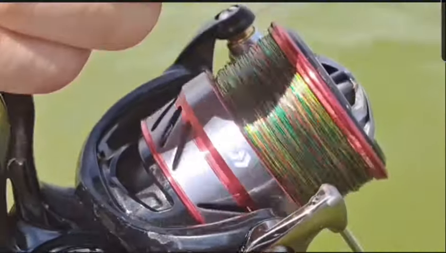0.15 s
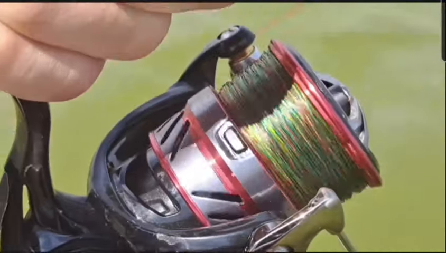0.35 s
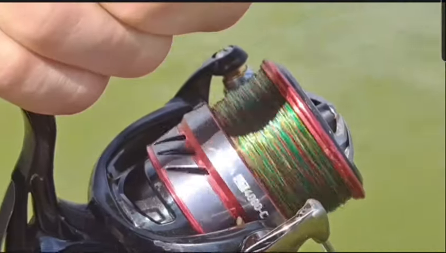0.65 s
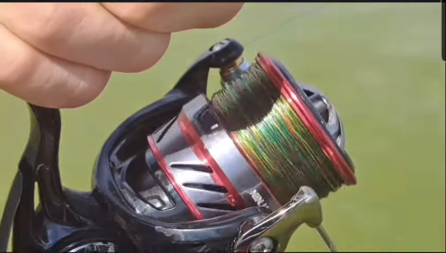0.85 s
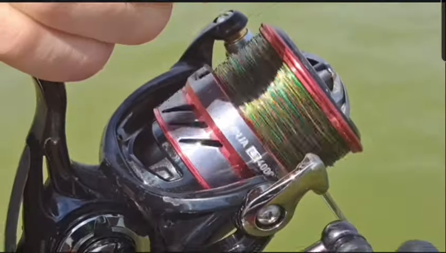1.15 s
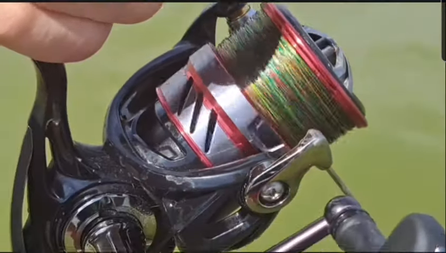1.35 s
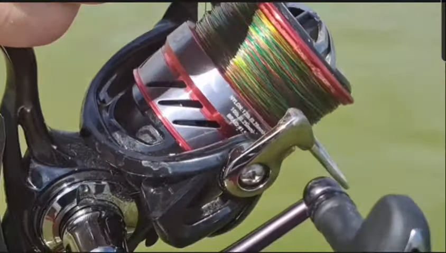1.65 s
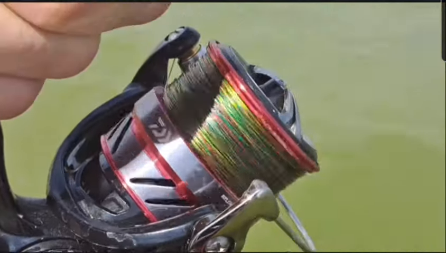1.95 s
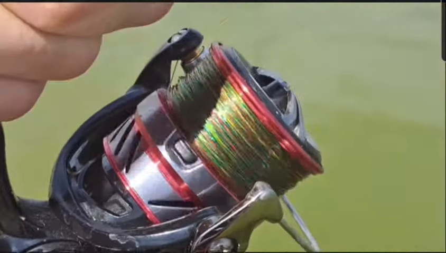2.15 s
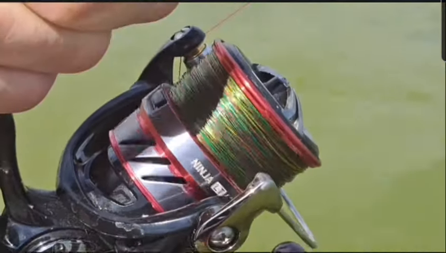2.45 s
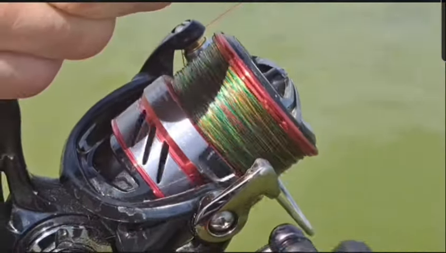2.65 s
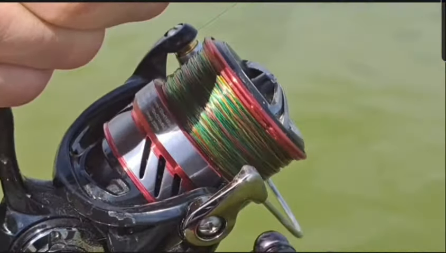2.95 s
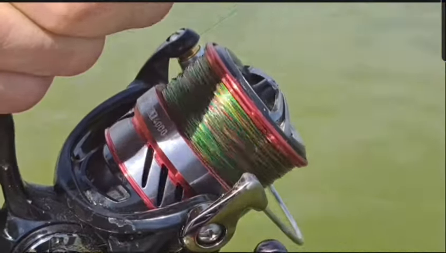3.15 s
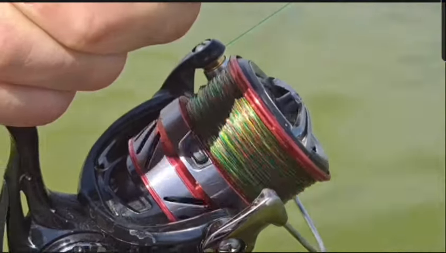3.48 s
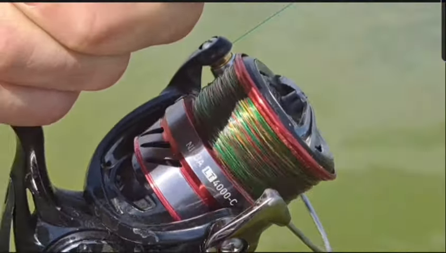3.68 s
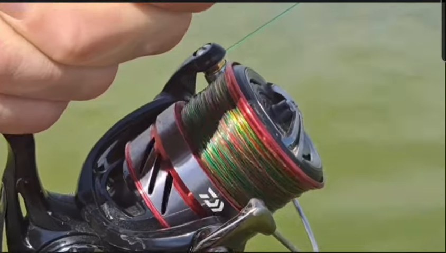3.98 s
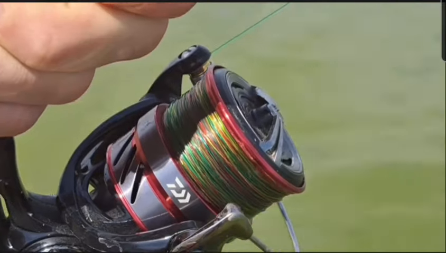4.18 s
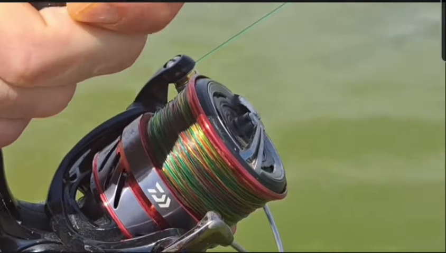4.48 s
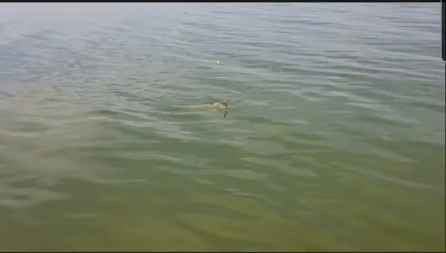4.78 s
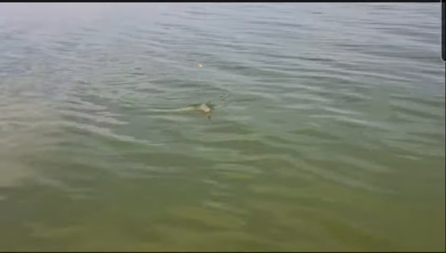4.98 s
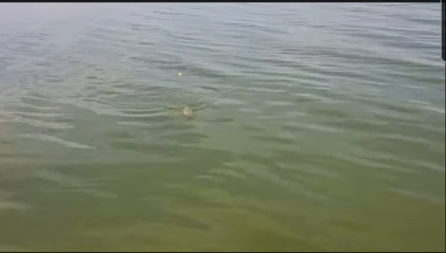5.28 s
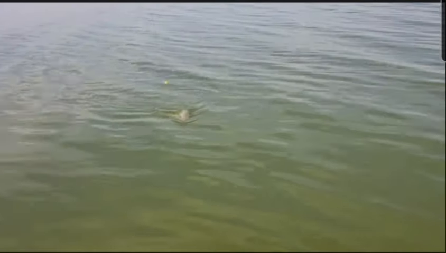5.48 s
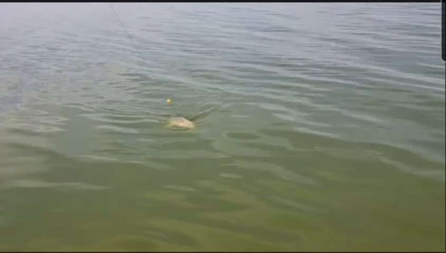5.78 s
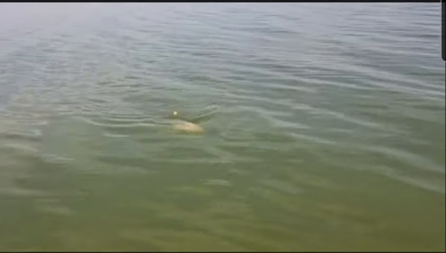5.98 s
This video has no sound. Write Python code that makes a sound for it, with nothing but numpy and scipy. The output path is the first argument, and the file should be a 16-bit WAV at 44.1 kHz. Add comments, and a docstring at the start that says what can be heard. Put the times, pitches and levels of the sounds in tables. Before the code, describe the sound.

A thin, crisp ratchet purr from a reel right at the stereo microphone, with pinging spring and hissy treble, rises and falls unevenly, then winds down tick by tick to rest. Far off a low motor hums in soft wind; its bass drops suddenly early on. A hard cut brings a pond, where a fish stirs the surface in wet slaps, gurgling bubbles and fine spray, calms, then splashes again.

```python
"""A spinning reel close to the microphones gives line to a hooked fish: the drag's pawl buzzes over its ratchet,
slows to single ticks and stops. Each tooth is a burst of noise that strikes resonances and a pinging spring.
Behind it an engine drones far off (sine multiples) under a breeze of coloured noise. Then the scene switches abruptly
to the open pond: wind, the engine at a lower speed, and water sloshing round the fish as noise and ringing bubbles."""
import sys
import numpy as np
from scipy import signal
from scipy.fft import rfft, irfft
from scipy.io import wavfile

SR = 44100
rng = np.random.default_rng(int(sys.argv[2]) if len(sys.argv) > 2 else 0)


def store_pcm(level_fs):
    """Save levels as 16-bit WAV."""
    pcm = np.round(np.clip(level_fs, -1, 1) * 32767).astype(np.int16)
    wavfile.write(sys.argv[1], SR, np.atleast_2d(pcm).T)


N = 270010
T = np.arange(N) / SR   # time of every sample [s]
# end of the even buzz, standstill of the spool, cut to the pond
BUZZ_END_S, STOP_S, SWITCH_S = 3.575, 4.3, 4.866

# Pans are left over right, positive to the left. Noise colours are relative: their layers set the level.

# microphone pair in the open, likeness of its channels: (frequency [Hz], correlation [-1 to 1])
LIKENESS = [(30, 0.3), (120, 0.75), (300, 0.83), (640, 0.24), (1400, -0.18), (3000, -0.22), (15000, 0)]
# place of the open surroundings: (frequency [Hz], pan [dB])
OPEN_PAN = [(60, 3), (200, -3.5), (700, -3), (1300, -5), (2400, -11.5), (4400, -20.5), (8000, -8.5),
            (14000, 2)]
# place of the sounds near the reel: (frequency [Hz], pan [dB])
NEAR_PAN = [(200, -2.5), (500, 0.5), (1300, -2), (3000, -6.5)]

# far engine heard by the reel: (time [s], speed [turns per s])
ENGINE_SPEED = [(0, 36), (2.2, 36), (3.0, 34.5), (3.7, 36.1)]
# its lines by the reel, over the throb: (multiple of the turning rate, relative level [dB])
DRONE = [(1, -7.5), (2, -0.5), (4, -14), (6, -7.5), (7, -9.5), (8, -22.5), (10, -26)]
# its firing tone on the third multiple: (time [s], level [dB])
FIRING_LEVEL = [(0, -44.5), (0.9, -45.5), (1.12, -39.5), (1.24, -54), (2.0, -51.5), (2.85, -47.5),
                (3.45, -45.5), (3.85, -51), (4.8, -46.5)]
# its lines by the pond: (multiple of the turning rate, level [dB])
POND_DRONE = [(3, -57.5), (5, -47), (7, -58), (8, -47.5), (10, -55.5), (11, -64)]
# a second low hum over the pond: (multiple of its pitch, level [dB])
POND_HUM = [(1, -57), (2, -51)]
POND_ENGINE_HZ, POND_HUM_HZ = 30.83, 62.2
# the bass sits on the left at first, then in the middle: (time [s], pan [dB])
BASS_PAN = [(0, 19.5), (1.19, 20), (1.24, 1), (4.87, 1)]
# the bass drops abruptly once and creeps back
BASS_DROP_S, BASS_RETURN_S = 1.17, 0.49
THROB_DB = (-45.5, -59.5, -53.5)   # before the drop, just after it, in the end
RUMBLE_DB, RUMBLE_EXTRA_DB = -53.5, 4   # low rumble of the air; the extra before the drop
GUST_DB = 1.17   # swing of the gusts

# colour of the air's rumble: (frequency [Hz], density [dB per Hz])
RUMBLE = [(20, 0), (90, 0.5), (160, -1), (220, 2.5), (300, -4.5), (400, -27.5)]
# colour of the breeze: (frequency [Hz], density [dB per Hz])
BREEZE = [(350, 9.5), (500, -4.5), (650, -9), (900, -16.5)]
# level of the breeze, which drops as the spool stops: (time [s], level [dB])
BREEZE_LEVEL = [(0, -59), (1.3, -58.5), (1.7, -54), (2.1, -57.5), (3.9, -58.5), (4.4, -66)]
# colour of the steady hiss: (frequency [Hz], density [dB per Hz])
HISS = [(3300, 13.5), (4200, 12), (7000, 11.5), (9000, -6), (12000, -3), (15500, -2)]
# colour of a faint, wide rush of the surroundings: (frequency [Hz], density [dB per Hz])
FAR_RUSH = [(650, -6), (880, -11), (1150, -1), (1400, 3.5), (1700, -3.5), (2100, -7)]
# likeness of its two channels: (frequency [Hz], correlation [-1 to 1])
FAR_RUSH_LIKENESS = [(650, 0.2), (1200, -0.67)]
FAR_RUSH_DB = -64
# a faint hiss that wavers in the background: (time [s], centre [Hz], level [dB])
WAVER = [(3.9, 2284, -74), (4.08, 2320, -70), (4.3, 2116, -73), (4.5, 1740, -80), (4.65, 1900, -69.5),
         (4.85, 2170, -68)]
WAVER_WIDTH_HZ = 360
# soft knocks of the hand on the rod: (time [s], level [dB])
KNOCKS = [(3.387, -41), (4.421, -45.5)]
# colour of the knocks: (frequency [Hz], density [dB per Hz])
KNOCK = [(250, 11), (600, -11), (1300, -7), (2200, -12)]

# colour of the wind over the pond: (frequency [Hz], density [dB per Hz])
WIND = [(12, -37), (20, -0.5), (80, -16), (145, -2), (201, -6.5), (247, -7), (380, -16), (435, -16),
        (700, -53), (910, -47), (1540, -120)]
# its level: (time [s], level [dB])
WIND_LEVEL = [(4.87, -44), (4.92, -48.5), (5.93, -45.5), (5.99, -49)]
# colour of sloshing water: (frequency [Hz], density [dB per Hz])
SLOSH = [(350, 1), (550, -3), (750, -11.5), (1100, -4), (1900, -4.5), (2600, -12.5), (3200, -60)]
# colour of the spray: (frequency [Hz], density [dB per Hz])
SPRAY = [(1410, 2.5), (2400, 9.5), (3550, 2), (5080, 7), (6270, 0.5), (6780, -2), (9410, -18.5),
         (12800, -12), (15500, -21)]
# the fish stirs the water:
# (time of peak [s], relative slosh [dB], relative spray [dB], swell [s], fall [s])
SLOSHES = [(4.88, -38.5, -43.5, 0.023, 0.045), (5.0, -49, -49.5, 0.089, 0.81),
           (5.185, -37.5, -47, 0.058, 0.12), (5.29, -42, -48.5, 0.038, 0.22),
           (5.42, -42.5, -52, 0.062, 0.025), (5.53, -45, -85, 0.021, 0.022),
           (6.033, -44.5, -44, 0.044, 0.065), (6.095, -40.5, -43.5, 0.041, 0.069)]
LAP_DB, FIZZ_DB = -49.5, -51.5   # lapping and spray between sloshes, on the scale of SLOSHES
SLOSH_LUMPS_DB = 2   # the slosh comes in lumps
# slaps of water: (time [s], relative level [dB], decay constant [s])
SLAPS = [(4.869, -60, 0.0076), (4.881, -42, 0.0008), (5.121, -40, 0.0066), (5.182, -59, 0.011),
         (5.28, -43, 0.007), (6.022, -57, 0.0036), (6.042, -44, 0.0021), (6.09, -57, 0.004)]
# big bubbles: (time [s], starting pitch [Hz], relative level [dB], decay by 60 dB [s])
PLOPS = [(4.881, 810, -11, 0.006), (4.884, 623, -44, 0.055), (5.09, 488, -43, 0.074),
         (5.121, 624, -35, 0.07), (5.148, 683, -38.5, 0.21), (5.181, 725, -23, 0.056),
         (5.205, 883, -32, 0.05), (5.28, 626, -48, 0.08), (5.484, 480, -32, 0.037),
         (5.505, 680, -30.5, 0.03), (5.522, 727, -38, 0.03), (5.819, 510, -37.5, 0.043),
         (5.978, 846, -30, 0.034), (5.998, 670, -38, 0.049), (6.023, 920, -26.5, 0.024),
         (6.034, 630, -29.5, 0.041), (6.048, 694, -33.5, 0.078), (6.052, 910, -35, 0.043),
         (6.086, 496, -32.5, 0.12), (6.094, 777, -31, 0.045)]
# single drops of spray tick on the water: (time [s], level [dB])
SPLATS = [(4.882, -31), (4.928, -40), (5.138, -36.5), (5.237, -40), (5.248, -32), (5.34, -36.5),
          (6.038, -28.5), (6.058, -37), (6.089, -37)]
# colour of those ticks: (frequency [Hz], density [dB per Hz])
SPLAT = [(2500, 13), (6000, 14), (9000, -5), (15000, -4)]

# how fast the fish turns the spool, in surges: (time [s], speed [ratchet teeth per s])
SPOOL = [(0.0, 96.1), (0.1, 82.6), (0.22, 65.7), (0.29, 53.1), (0.4, 52.7), (0.47, 75.8), (0.62, 81.6),
         (0.67, 92.2), (0.75, 96.6), (0.8, 102.7), (0.88, 93.5), (1.03, 111.9), (1.12, 102.6), (1.27, 99.9),
         (1.4, 83.3), (1.48, 71.7), (1.57, 74.9), (1.71, 63.2), (1.79, 46.4), (1.87, 51.0), (1.97, 56.7),
         (2.05, 77.1), (2.18, 66.7), (2.3, 60.0), (2.38, 67.8), (2.45, 93.4), (2.53, 99.6), (2.65, 86.6),
         (2.75, 79.2), (2.83, 100.7), (2.96, 102.7), (3.03, 79.9), (3.2, 63.8), (3.4, 52.3), (3.59, 44.0)]
CRUISE_TEETH_PER_S = 75
# the reel sways towards the middle, between the microphone ports: (time [s], pan [dB])
REEL_PAN = [(0, -3.5), (1.1, -2), (2.0, 1), (3.6, -1.5), (4.3, -3.5)]
# colour of the rustling line: (frequency [Hz], density [dB per Hz])
RUSTLE = [(650, -4.5), (950, -10), (1450, -1.5), (1850, -2), (2300, -1.5), (2650, -0.5)]
# rustle against SNAP_LEVEL at cruising speed, its rise per doubling of speed, its flicker
RUSTLE_DB, RUSTLE_DB_PER_OCTAVE, RUSTLE_FLICKER_DB = -21.5, 6, 2.0
# one soft swish as the spool runs down: middle, half length, pitch, width, level
SWISH_S, SWISH_HALF_S, SWISH_HZ, SWISH_WIDTH_HZ, SWISH_DB = 3.83, 0.23, 1431, 160, -60.5

# Levels of the drag are relative: drag() adds the gains given in scene().
# how loudly the pawl's snap reaches the microphone: (time [s], relative level [dB])
SNAP_LEVEL = [(0, -29.5), (0.5, -31.5), (1.15, -32.5), (1.27, -35.5), (1.9, -34.5), (2.8, -36.5),
              (3.6, -36)]
# colour of the dry snap of a tooth: (frequency [Hz], density [dB per Hz])
SNAP = [(1000, -13), (2250, -6.5), (3000, -19), (4200, -5), (5600, 2), (6300, 6.5), (8000, 8), (9000, -5.5),
        (10500, 7), (13000, 5), (15700, 5)]
# its place, on top of the reel's: (frequency [Hz], pan [dB])
SNAP_PAN = [(2000, 4), (5800, -0.5), (7500, 11), (8800, 11), (10500, 1.5), (15000, 3.5)]
# colour of the crack of the landing: (frequency [Hz], density [dB per Hz])
CRACK = [(10500, -8), (13000, 1), (15500, -4)]
# teeth on which the pawl catches hard and its spring rings out: (time [s], relative ring [dB])
CATCHES = [(0.046, -27.5), (0.101, -24.5), (0.114, -28), (0.126, -26), (0.139, -28), (0.223, -30),
           (0.273, -23), (0.291, -23), (0.311, -21), (0.568, -30.5), (0.618, -27), (0.654, -26.5),
           (0.697, -25), (0.782, -28), (1.036, -30), (1.249, -35), (1.322, -29), (1.464, -29.5),
           (1.719, -31), (1.735, -28), (1.814, -35), (1.95, -27.5), (2.425, -27.5), (2.541, -28.5),
           (2.814, -32), (3.241, -33), (3.274, -32)]
# single ticks as the spool runs down, one faint bounce, and two late ticks after it stops:
# (time [s], relative snap [dB], spring ring [dB],
# low spool ring [dB], middle spool ring [dB], high spool ring [dB])
TICKS = [(3.585, -36, -40, -60, -39, -51), (3.611, -37, -40, -52, -37, -54),
         (3.638, -38, -38, -57, -39, -43), (3.668, -37.5, -42, -46, -38.5, -47),
         (3.701, -37, -53, -44, -38, -45), (3.738, -34.5, -42, -59, -38, -62),
         (3.775, -38, -46, -58, -40, -47), (3.815, -38.5, -59, -52, -44, -52),
         (3.86, -39.5, -48, -46, -38, -52), (3.903, -37, -44, -50, -58, -50),
         (3.945, -37.5, -46, -59, -52, -47), (3.986, -37.5, -39, -50, -49, -48),
         (4.032, -39.5, -45, -48, -46, -55), (4.081, -39.5, -37.5, -50, -42, -45),
         (4.136, -36, -39.5, -56, -45, -51), (4.152, -53, -65, -66, -68, -59),
         (4.2, -38.5, -51, -48, -62, -48), (4.286, -39, -31.5, -60, -44.5, -62),
         (4.803, -38.5, -51, -56, -57, -54), (4.853, -34, -44, -45, -40, -50)]
# damped modes of the body:
# (frequency [Hz], width [Hz], relative level [dB], pan [dB], left lead [samples])
BODY_MODES = [(2330, 300, -21, -2, 19), (4730, 150, -8.5, -2, 19), (5160, 260, -5.5, -2, 18),
              (7150, 300, -4, -5, 23), (7400, 300, -1.5, -6, 23), (9790, 240, -5.5, 3, 23),
              (11400, 300, -11, -1, 22), (12480, 240, -9, 1, 22), (13060, 360, -1, 3, 22),
              (13550, 300, -10, 3, 22), (14750, 420, -6, 3, 19)]
# long-ringing modes of the spool:
# (frequency [Hz], decay by 60 dB [s], relative level [dB], pan [dB], left lead [samples])
SPOOL_RINGS = [(4881, .085, 0, -2, 19), (6770, .12, 1.5, -6, 23), (6964, .1, -6, -6, 23),
               (9364, .085, -1, 4, 22), (11688, .035, 3, 0, 22), (12090, .075, 0, 1, 22),
               (15050, .04, 0, 3, 22)]
LEFT_LEAD = 22   # samples by which snap, crack and spring reach the left port first
RING_SPLIT_HZ = (6000, 9000)   # borders between the spool's low, middle and high rings
SPOOL_RING_DB = (-15.5, -7, -16.5)   # those three during the buzz, against the snap
RING_UNEVEN_DB = 5.5   # they flare up on some teeth and hardly sound on others
OFFSET_S = 0.0014   # a soft noise starts this early before each click; crack and spool ring follow as late
# the snap grows a little louder with speed, while the crack is stronger on a slow spool
SNAP_DB_PER_OCTAVE, CRACK_DB_PER_HALVING = 1.3, 2.5
# the spring rings harder the faster the spool turns: against the snap at cruising speed, per doubling
SPRING_HZ, RING_DB, RING_DB_PER_OCTAVE = 7370, -2.5, 4.5
CATCH_SOFTER_DB = 0.5   # a tooth that sets the spring ringing snaps less
# the pawl scrapes between drops: against SNAP_LEVEL at cruising speed, per doubling, graininess
SCRAPE_DB, SCRAPE_DB_PER_OCTAVE, SCRAPE_GRAIN_DB = -23.5, 6.5, 0
# spread from tooth to tooth
TOOTH_UNEVEN_DB, MODE_UNEVEN_DB, SPRING_UNEVEN_DB, BRIGHT_UNEVEN_DB = 1.1, 3.3, 2.6, 2

CUTOFF_HZ = 15950   # upper limit of the treble


def from_db(db):
    """Decibels to gain."""
    return 10 ** (np.asarray(db) / 20)


def rms_one(x):
    """Scale to rms 1."""
    return x / np.sqrt(np.mean(x ** 2) + 1e-20)


def in_time(rows):
    """Each column of a curve at every sample."""
    s, *columns = np.transpose(rows)
    return [np.interp(T, s, c) for c in columns]


def at_hz(points, hz):
    """Read a table on a log-frequency axis."""
    table_hz, values = np.array(points).T
    return np.interp(np.log(hz + 0.0011), np.log(table_hz), values)


def panned(pan_db):
    """Left and right gains of constant power."""
    gains = from_db(np.array([[.5], [-.5]]) * pan_db)
    return gains / np.sqrt(np.mean(gains ** 2, axis=0))


def left_first(pair, count):
    """The reel is nearer to the left port: the right one hears it some samples later."""
    left, right = pair
    return np.array([left, np.r_[np.zeros(count), right[:-count]]])


def drift(rate):
    """Slow chance of spread 1: noise through a two-pole low-pass, computed every 40 samples."""
    r = np.exp(-80 * np.pi * rate / SR)
    white = rng.standard_normal(N // 40 + 2002)
    slow = signal.lfilter([1], [1, -2 * r, r * r], white)[2000:]   # settled part
    return np.interp(np.arange(N) / 40, np.arange(len(slow)), rms_one(slow))


def resonate(x, hz, width_hz):
    """One resonance; white noise keeps its power."""
    r = np.exp(-np.pi * width_hz / SR)
    poles = [1, -2 * r * np.cos(2 * np.pi * hz / SR), r * r]
    return np.sqrt((1 - r * r) / 2) * signal.lfilter([1, 0, -1], poles, x + 1e-18)


def noise(spectrum, pan, likeness=LIKENESS):
    """Stereo noise of a given colour, place and likeness, falling steeply past its ends; rms 1."""
    hz = np.arange(N // 2 + 1) * SR / N
    mid, side = rfft(rng.standard_normal((2, N)))
    alike = np.clip(at_hz(likeness, hz), -1, 1)
    pair = np.sqrt(1 + alike) * mid + np.sqrt(1 - alike) * side * [[1], [-1]]
    low_hz, high_hz = spectrum[0][0], spectrum[-1][0]
    ends = (1 + (low_hz / (hz + 1)) ** 8) * (1 + (hz / high_hz / 1.2) ** 8)
    colour = from_db(at_hz(spectrum, hz)) / np.sqrt(ends)
    return rms_one(irfft(pair * colour * panned(at_hz(pan, hz)), N))


def bursts(times, levels_db, rise_s, decay_s):
    """An envelope that swells and dies at each time, peaking at its level; overlaps add up."""
    hits, age = np.zeros(N), T[:SR // 8]
    at = np.clip(np.round(np.asarray(times) * SR).astype(int), 0, N - 1)
    np.add.at(hits, at, from_db(levels_db))
    shape = (1 - np.exp(-(age / rise_s) ** 2)) * np.exp(-age / decay_s)
    return signal.oaconvolve(hits, shape / shape.max())[:N]


def add(out, s, sound):
    """Mix a short sound in at its time."""
    at = min(int(s * SR), N - 1)
    out[at:at + len(sound)] += sound[:N - at]


def octaves_over_cruise():
    """Speed of the spool in doublings over its cruising speed; after the buzz it runs down to rest."""
    run_down = np.clip((STOP_S - T) / (STOP_S - BUZZ_END_S), 1e-4, 1)
    return np.log2(in_time(SPOOL)[0] * run_down / CRUISE_TEETH_PER_S)


def round_the_drop(before_db, after_db, end_db):
    """Level of a bass layer: steady, then a sudden drop from which it creeps to its end level."""
    since = np.maximum(T - BASS_DROP_S, 0)
    later_db = end_db + (after_db - end_db) * np.exp(-since / BASS_RETURN_S)
    return before_db + (later_db - before_db) * np.clip(since / 0.021, 0, 1)


def wavering_hiss():
    """As the spool quietens, a faint band of hiss comes up: low noise on a carrier that wanders."""
    centre_hz, level_db = in_time(WAVER)
    low_pass = signal.butter(2, WAVER_WIDTH_HZ / 2, fs=SR, output="sos")
    band = rms_one(signal.sosfilt(low_pass, rng.standard_normal((2, N))))
    carrier = np.sqrt(2) * np.sin(2 * np.pi * np.cumsum(centre_hz) / SR)
    fade_in = np.clip((T - BUZZ_END_S) / 0.5, 0, 1)
    return fade_in * panned(-11) * from_db(level_db + 1.65 * drift(19)) * band * carrier


def engine(turns_hz, lines, waver, flutter_db):
    """Far away only low multiples of the turning rate are left, each fluttering in the wind."""
    phase = 2 * np.pi * np.cumsum(turns_hz * (1 + waver * drift(4.1))) / SR
    out = 0
    for multiple, db in lines:
        level = from_db(db + flutter_db * drift(1.0))
        out = out + level * np.sin(round(multiple) * phase + 2 * np.pi * rng.random())
    return out


def bank():
    """Round the reel: the engine's sines, and noise for rumble, breeze, rush, knocks and hiss."""
    throb_db = round_the_drop(*THROB_DB)
    lines = [(multiple, db + throb_db) for multiple, db in DRONE] + [(3, in_time(FIRING_LEVEL)[0])]
    drone = engine(in_time(ENGINE_SPEED)[0], lines, waver=0.0034, flutter_db=1.7)
    gust_db = GUST_DB * drift(3.5)
    rumble_db = RUMBLE_DB + round_the_drop(RUMBLE_EXTRA_DB, 0, 0) + .5 * gust_db
    rumble = from_db(rumble_db) * noise(RUMBLE, NEAR_PAN)
    breeze = from_db(in_time(BREEZE_LEVEL)[0] + gust_db) * noise(BREEZE, NEAR_PAN)
    knocks = bursts(*np.transpose(KNOCKS), rise_s=.001, decay_s=0.0031) * noise(KNOCK, NEAR_PAN)
    hiss = from_db(-64.5) * noise(HISS, OPEN_PAN)
    rush = from_db(FAR_RUSH_DB) * noise(FAR_RUSH, NEAR_PAN, FAR_RUSH_LIKENESS)
    bass = (drone + rumble) * panned(in_time(BASS_PAN)[0])
    return bass + breeze + knocks + hiss + rush + wavering_hiss()


def water_levels():
    """Each slosh swells and dies away over the steady lapping: dB of the slosh and of its spray."""
    power = from_db([[LAP_DB], [FIZZ_DB]]) ** 2
    for s, slosh_db, spray_db, swell_s, fall_s in SLOSHES:
        swell = (np.minimum(T - s, 0) / swell_s) ** 2
        fall = np.maximum(T - s, 0) / fall_s
        power = power + (from_db([[slosh_db], [spray_db]]) * np.exp(-swell - fall)) ** 2
    return 10 * np.log10(power)


def bubble(hz, t60, rise):
    """A bubble rings and climbs in pitch as it nears the surface."""
    age = T[:int(t60 * SR)]
    envelope = from_db(-60 * age / t60) * (1 - np.exp(-age * hz))
    return np.sin(2 * np.pi * hz * age * (1 + rise * age / t60)) * envelope


def droplets(per_s, low_hz, high_hz, cycles, spread_db):
    """Small bubbles burst at random, each ringing a few cycles at one of 16 pitches; rms 1."""
    sizes = from_db(spread_db * np.minimum(rng.exponential(1, N), 4)) * rng.choice([-1, 1], N)
    born = rng.random(N) < per_s / SR
    pitch = rng.integers(0, 16, N)
    out = 0
    for k, hz in enumerate(np.geomspace(low_hz, high_hz, 16)):
        out = out + resonate(sizes * born * (pitch == k), hz, hz / cycles) * (low_hz / hz) ** .5
    return rms_one(out)


def gurgle(level_db, per_s, low_hz, high_hz, cycles, spread_db):
    """Stirred water sheds small rising bubbles that follow the slosh; the high ones are weaker."""
    out = np.zeros(N)
    pond_s = T[-1] - SWITCH_S
    for when, pitch, size in rng.random((600, 3))[:int(per_s * pond_s)]:
        s = SWITCH_S + when * pond_s
        hz = low_hz * (high_hz / low_hz) ** pitch
        level = from_db(level_db[int(s * SR)] - spread_db * size) * (low_hz / hz) ** 0.12
        add(out, s, level * bubble(hz, cycles / hz, rise=0.1))
    return out


def pond():
    """Wind noise and engine sines under water: noise for slosh, spray and slaps, rings for bubbles."""
    slosh_db, spray_db = water_levels()
    wind = from_db(in_time(WIND_LEVEL)[0] + 1.0 * drift(8.5)) * noise(WIND, OPEN_PAN)
    drone = engine(POND_ENGINE_HZ, POND_DRONE, waver=0.0018, flutter_db=3.2)
    hum = engine(POND_HUM_HZ, POND_HUM, waver=0.016, flutter_db=2.5)
    slaps = sum(bursts([s], [db], rise_s=0.00028, decay_s=decay) for s, db, decay in SLAPS)
    slosh_gain = from_db(slosh_db - 4.0 + SLOSH_LUMPS_DB * drift(34))
    slosh = (slosh_gain + slaps) * noise(SLOSH, OPEN_PAN)
    spray = from_db(spray_db + 2.4 * drift(69.0)) * noise(SPRAY, OPEN_PAN)
    drops = droplets(per_s=500, low_hz=2020, high_hz=6160, cycles=11.0, spread_db=-6.0)
    spatter = from_db(spray_db - 15.0) * drops
    # water bursts softly
    spatter = signal.sosfilt(signal.butter(4, 6500, fs=SR, output="sos"), spatter)
    bubbles = gurgle(slosh_db + 6.5, per_s=190, low_hz=505, high_hz=2666, cycles=32.0, spread_db=12.5)
    for s, hz, db, t60 in PLOPS:
        add(bubbles, s, from_db(db) * bubble(hz, t60, rise=0.031))
    splats = bursts(*np.transpose(SPLATS), rise_s=0.00036, decay_s=0.001) * noise(SPLAT, NEAR_PAN)
    water = slosh + spray + splats + spatter * panned(4.4) + bubbles * panned(-6.5)
    return wind + drone + hum + water


def running_line():
    """The line rustles the louder the faster it runs, and swishes once as it slows."""
    level_db = in_time(SNAP_LEVEL)[0] + RUSTLE_DB + RUSTLE_DB_PER_OCTAVE * octaves_over_cruise()
    rustle = from_db(level_db + RUSTLE_FLICKER_DB * drift(14.0)) * noise(RUSTLE, NEAR_PAN)
    swell = from_db(SWISH_DB) * np.exp(-((T - SWISH_S) / SWISH_HALF_S) ** 2)
    return rustle + swell * resonate(rng.standard_normal((2, N)), SWISH_HZ, SWISH_WIDTH_HZ)


def per_tooth(times):
    """Clipped normal chance, drawn anew at each drop and held until the next."""
    return np.clip(rng.standard_normal(400), -1.6, 1.6)[np.searchsorted(times, T)]


def teeth(jitter_s, uneven_db, ring_uneven_db):
    """The pawl drops once per tooth, a little unevenly: all drops, in rows like those of TICKS."""
    passed = np.cumsum(in_time(SPOOL)[0][T < BUZZ_END_S]) / SR   # teeth gone by
    times = np.interp(np.arange(int(passed[-1]) + 1), passed, T[:len(passed)])
    early, hard, true, *seats = rng.standard_normal((400, 6))[:len(times)].T
    octaves = np.interp(times, T, octaves_over_cruise())
    snaps = np.interp(times, T, in_time(SNAP_LEVEL)[0]) + SNAP_DB_PER_OCTAVE * octaves + uneven_db * hard
    rings = snaps + RING_DB + RING_DB_PER_OCTAVE * octaves + ring_uneven_db * np.minimum(true, 1)
    spool = [snaps + db + RING_UNEVEN_DB * np.minimum(seat, 1.6)
             for db, seat in zip(SPOOL_RING_DB, seats)]
    times = times + jitter_s * early
    for s, db in CATCHES:
        tooth = np.argmin(abs(times - s))
        times[tooth], rings[tooth] = s, db
        snaps[tooth] -= CATCH_SOFTER_DB
    return np.vstack([np.transpose([times, snaps, rings, *spool]), TICKS])


def ring(clicks, hz, t60):
    """A unit click sets a sine of starting height 1 ringing."""
    r, w = from_db(-60 / (t60 * SR)), 2 * np.pi * hz / SR
    return signal.lfilter([0, np.sin(w)], [1, -2 * r * np.cos(w), r * r], clicks + 1e-18)


def spool_rings(times, levels_db):
    """Each landing rings the spool; its low, middle and high modes have strengths of their own."""
    out = np.zeros((2, N))
    at = ((times + OFFSET_S) * SR).astype(int)
    for hz, t60, level_db, pan_db, lead in SPOOL_RINGS:
        signs = rng.choice([-1, 1], 400)[:len(times)]
        clicks = np.zeros(N)
        clicks[at] = signs * from_db(level_db + levels_db[np.searchsorted(RING_SPLIT_HZ, hz)])
        out += left_first(panned(pan_db) * ring(clicks, hz, t60), count=lead)
    return out


def drag(snap_db, body_db, spring_db, tail_db, lead_in_db, crack_db):
    """Each drop is a few ms of metal chatter, direct and through body and spool modes; the spring pings."""
    drops = teeth(jitter_s=0.00025, uneven_db=TOOTH_UNEVEN_DB, ring_uneven_db=SPRING_UNEVEN_DB)
    times, snaps, rings, *spool_db = drops.T
    octaves = octaves_over_cruise()
    # micro-bounces make the chatter grainy
    chatter = bursts(times, snaps, rise_s=0.00088, decay_s=0.0039) * from_db(1.23 * drift(570))
    # a soft, very short burst of noise leads into each click, and a rattle follows
    lead_in = from_db(lead_in_db) * bursts(times - OFFSET_S, snaps, rise_s=0.0011, decay_s=0.00032)
    rattle = from_db(tail_db) * bursts(times, snaps, rise_s=0.0005, decay_s=0.022)
    # at speed it scrapes over the flanks between drops, and the teeth fuse into a buzz
    scrape_db = in_time(SNAP_LEVEL)[0] + SCRAPE_DB + SCRAPE_DB_PER_OCTAVE * octaves
    scrape = from_db(scrape_db + SCRAPE_GRAIN_DB * drift(600))
    # noise partly shared by the two ports
    contact = (chatter + lead_in + scrape) * (rng.standard_normal(N) + .5 * rng.standard_normal((2, N)))

    bright = from_db(snap_db + BRIGHT_UNEVEN_DB * per_tooth(times))
    snap_noise = noise(SNAP, SNAP_PAN, likeness=[(1000, 0.079), (15000, 0.051)])
    snap = bright * (lead_in + chatter + rattle + scrape) * snap_noise
    # the landing itself is one short, very bright crack
    halvings = np.clip(-np.interp(times, T, octaves), 0, 2)
    cracks_db = snaps + crack_db + CRACK_DB_PER_HALVING * halvings
    crack = bursts(times + OFFSET_S, cracks_db, rise_s=0.00031, decay_s=0.0014) * noise(CRACK, SNAP_PAN)
    # the spring's pitch shifts a little with its seat on each tooth
    spring_hz = SPRING_HZ * (1 + 0.0073 * per_tooth(times) + 0.00931 * drift(150.7))
    ping = np.sin(2 * np.pi * np.cumsum(spring_hz) / SR) * bursts(times, rings, rise_s=0.002, decay_s=0.0022)
    out = left_first(snap + crack + from_db(spring_db) * panned(-14) * ping, count=LEFT_LEAD)
    for hz, width_hz, level_db, pan_db, lead in BODY_MODES:
        # each mode's strength varies by chance from tooth to tooth
        struck = from_db(level_db + body_db + MODE_UNEVEN_DB * per_tooth(times))
        out += left_first(panned(pan_db) * resonate(struck * contact, hz, width_hz), count=lead)
    return out + spool_rings(times, spool_db)


def scene():
    """The close reel on the bank, then an abrupt switch to the open pond."""
    at_pond = np.clip((T - SWITCH_S) / 0.0016, 0, 1)
    reel = drag(snap_db=-4.0, body_db=-8.5, spring_db=5.5, tail_db=-23.5, lead_in_db=-14.0, crack_db=-3)
    by_the_reel = reel * panned(in_time(REEL_PAN)[0]) + running_line() + bank()
    return (1 - at_pond) * by_the_reel + at_pond * pond()


def record(dry):
    """An elliptic low-pass cuts the top steeply."""
    return signal.sosfilt(signal.ellip(12, .2, 70, CUTOFF_HZ, fs=SR, output="sos"), dry)


dry = scene()
out = record(dry)
store_pcm(out)
```